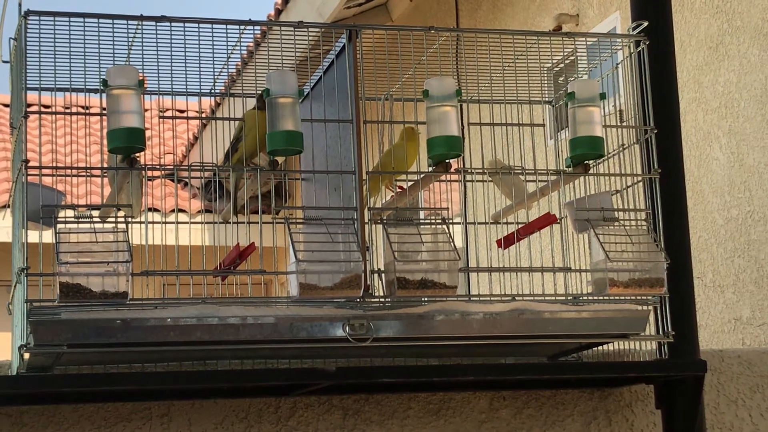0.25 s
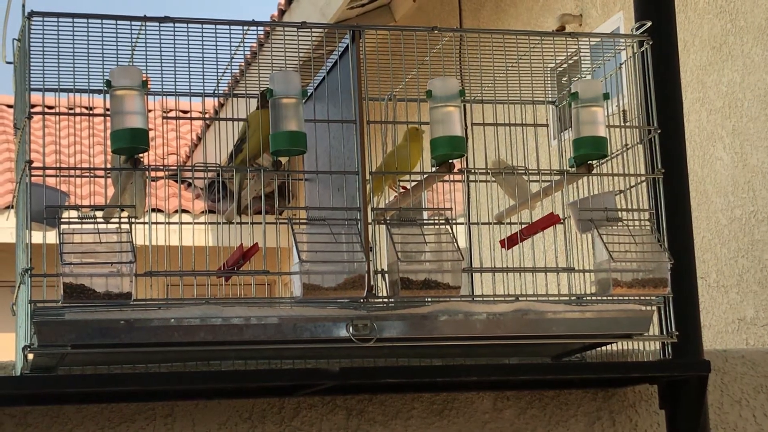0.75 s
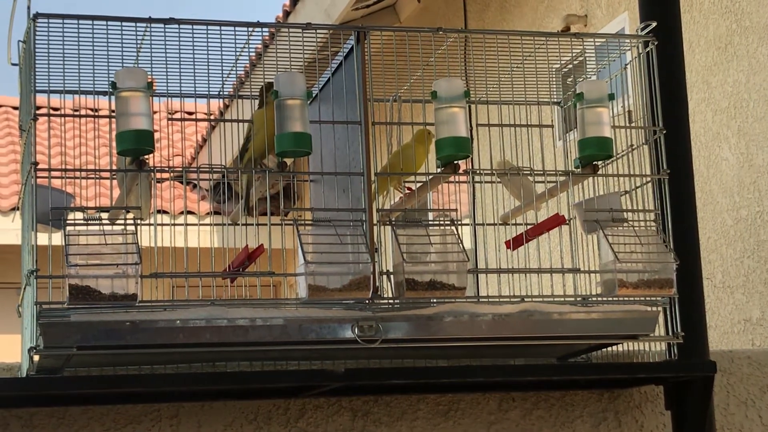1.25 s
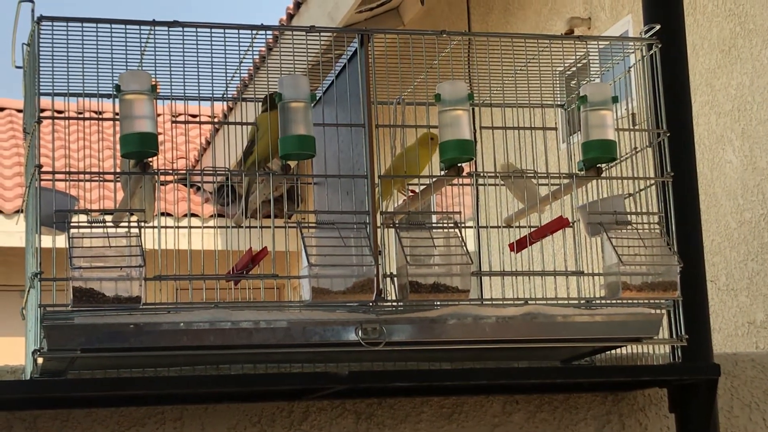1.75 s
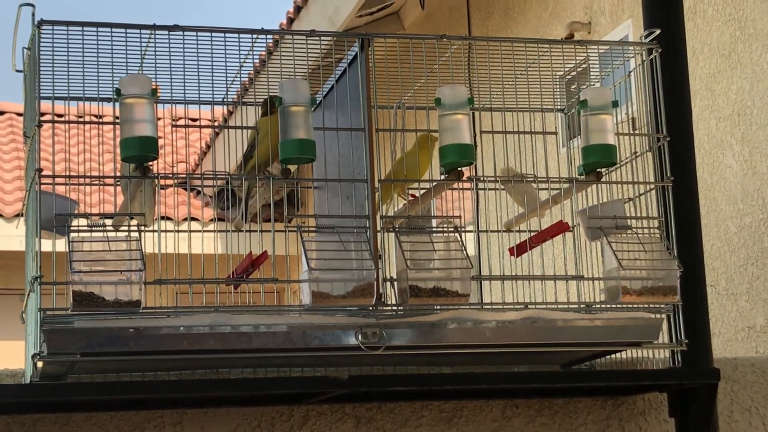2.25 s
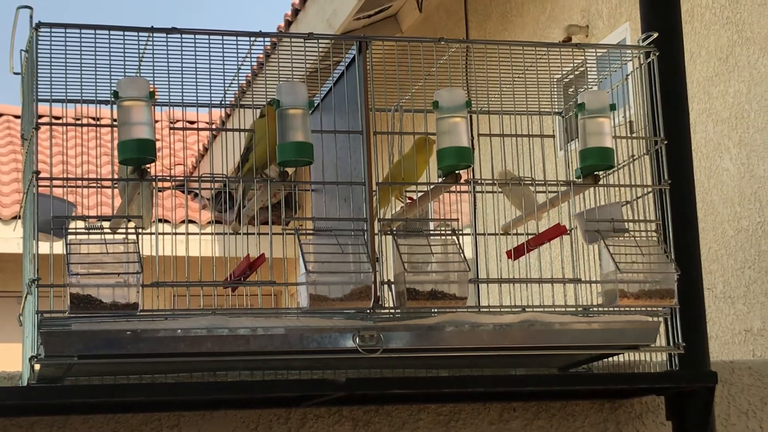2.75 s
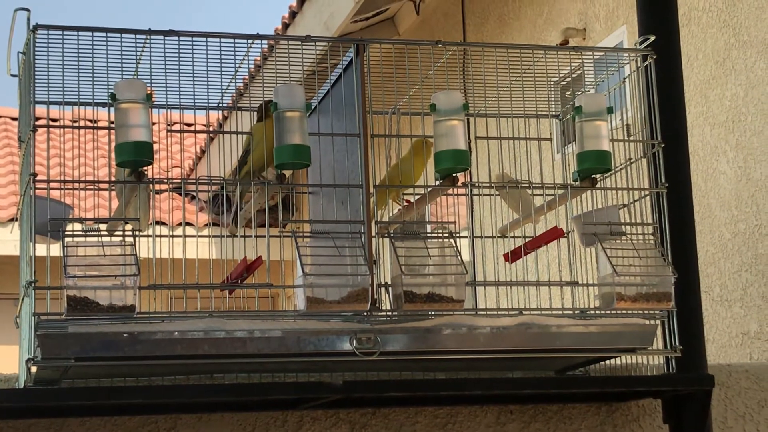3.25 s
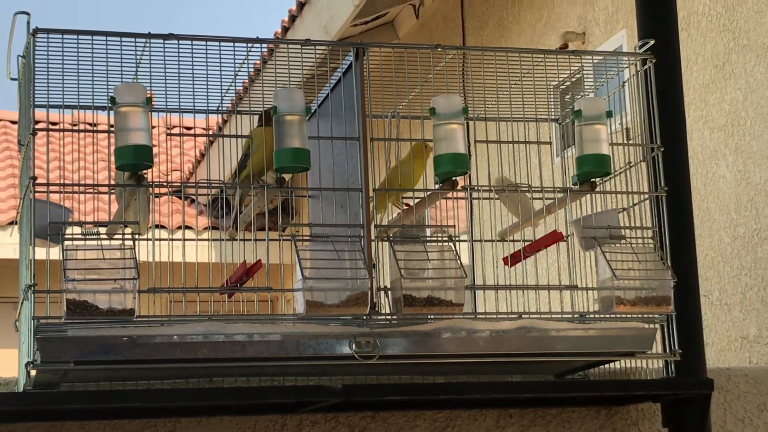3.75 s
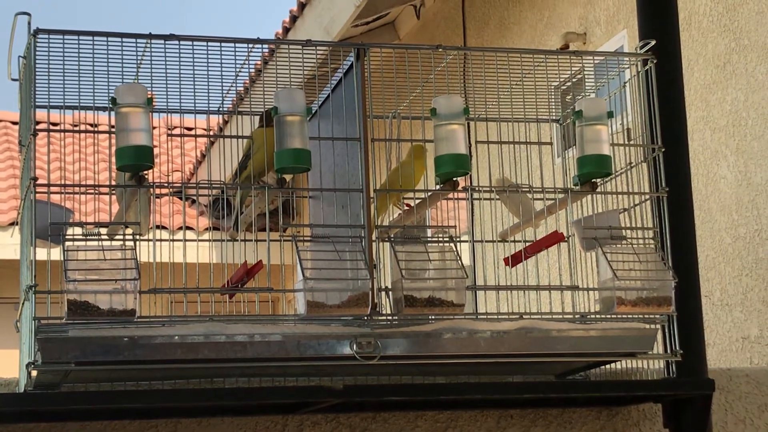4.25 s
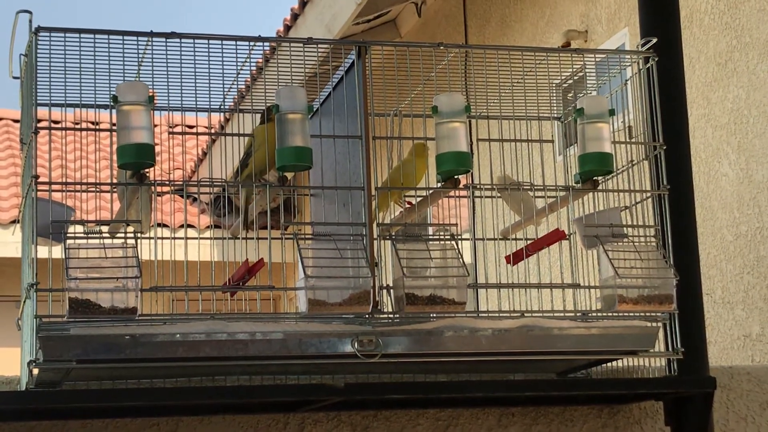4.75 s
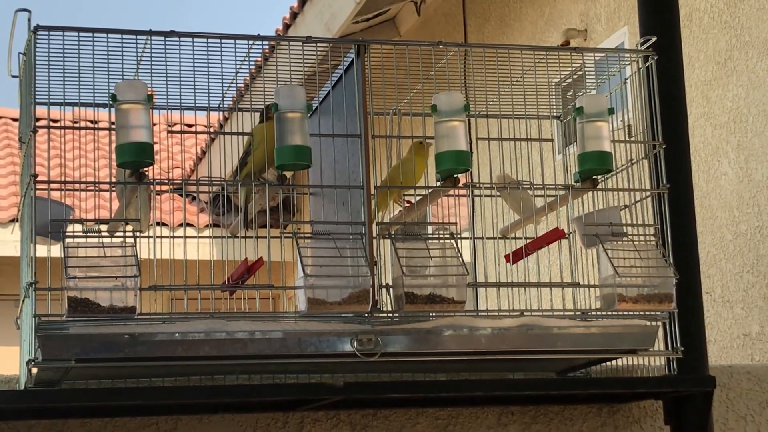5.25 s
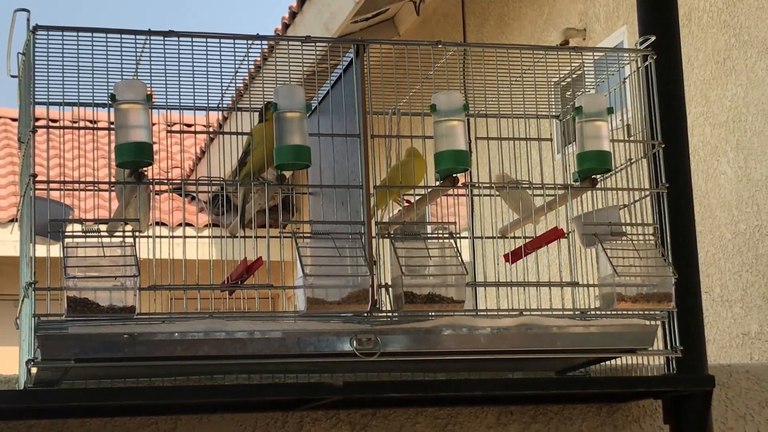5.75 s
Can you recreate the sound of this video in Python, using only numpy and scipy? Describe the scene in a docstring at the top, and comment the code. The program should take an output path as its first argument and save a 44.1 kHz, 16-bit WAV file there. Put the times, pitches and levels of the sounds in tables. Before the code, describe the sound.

Bright, crisp canary song starts at once with repeated warbling syllables, drops to purring rolls, pauses into sparse whistles, then runs through steep downward chirps and further rolls and dives before ending in rapid, nearly level pips. The cage hangs by a house wall, so notes carry slight metallic scatter and short echoes. The quiet background is soft distant traffic and low hum, with a far engine swelling late. Mono, fairly near microphone.

```python
"""Canaries sing in a wire cage under the eaves of a house: a warble, low rolls, diving syllables, a fast
closing trill. Whistles are gliding sines with a few leaked overtones; each roll beat is a raspy chip and a low
note. The treble reaches the ear mostly diffuse and smeared, the tray and walls throw the notes back, and the
yard rings briefly. Behind them lie the wash of a town in shaped noise, a machine's hum and a far engine that
comes up, then eases; both machines are sets of wavering sines."""
import sys
import numpy as np
from scipy import signal
from scipy.fft import rfft, irfft
from scipy.io import wavfile

SR = 44100
rng = np.random.default_rng(int(sys.argv[2]) if len(sys.argv) > 2 else 0)


def to_wav(s):
    """Save 16-bit WAV."""
    ch = np.atleast_2d(s).T  # columns
    pcm = np.round(np.clip(ch, -1, 1) * 32767)  # PCM
    wavfile.write(sys.argv[1], SR, pcm.astype(np.int16))


N = 263718
TIME = np.arange(N) / SR

# boost of the whistles' and pips' overtones as the beak opens: t/s, level/dB
BEAK = [(0, 6), (.45, 4), (.9, 1), (1.9, 3.5), (2.05, -3.5), (2.25, 3.5), (2.6, 3), (3.15, 2.5), (3.7, 2),
        (4.1, 1), (4.9, 3), (5.3, 3.5), (5.8, 0.5)]


def gain_of(db):
    """Decibels to amplitude."""
    return 10 ** (np.asarray(db) / 20)


def evened(x):
    """Scales to rms 1."""
    return x / np.sqrt(np.mean(x ** 2) + 1e-20)


def read(points, hz):
    """Reads a spectrum on a log-frequency axis."""
    f, value = np.transpose(points)
    return np.interp(np.log(hz + 1), np.log(f), value)


def at_time(curve, s):
    """Reads a curve at one or more times."""
    return np.interp(s, *np.transpose(curve))


def add(mix, s, sound):
    """Adds a sound to the mix at time s."""
    start = max(round(s * SR), 0)
    part = mix[start:][:len(sound)]
    part += sound[:len(part)]


def drift(rate_hz):
    """Smooth random motion of rms 1, up to about the given rate."""
    hz = np.fft.rfftfreq(N, 1 / SR)
    lowpass = np.exp(-.5 * (hz / rate_hz) ** 2)
    return evened(irfft(rfft(rng.standard_normal(N)) * lowpass, N))


def glide(length, start, middle, end):
    """Progress 0-1 through a note, and a pitch that arches through three points."""
    u = np.linspace(0, 1, max(round(length * SR), 8))
    slope = 4 * middle - 3 * start - end
    curvature = 2 * (start + end - 2 * middle)
    return u, start + slope * u + curvature * u * u


def syrinx(s, hz, tremor, jitter):
    """Phase of the vibrating membrane, whose pitch trembles a little."""
    shake = np.take(tremor, round(s * SR) + np.arange(len(hz)), mode="wrap")
    return 2 * np.pi * np.cumsum(hz * (1 + jitter * shake)) / SR


def pulsed(s, u, tremor, sharpness, unrest_db):
    """The air pressure swells and falls within one note, never quite smoothly."""
    unrest = np.take(tremor, np.arange(len(u)) - round(s * SR), mode="wrap")
    arch = np.sin(np.pi * u ** 0.95)  # peaks a little before the middle
    return abs(arch) ** sharpness * gain_of(unrest_db * unrest)


def whistle(phase, hz, second_db, third_db, fourth_db, beak_db):
    """The throat is tuned to the fundamental, so only part of the overtones gets out."""
    # leak of the overtones past the throat: f/Hz, level/dB
    leak = [(3000, -6.5), (6000, -34), (8000, -40.5), (9500, -26.5), (11000, -29.5), (13000, -21),
            (15500, -15)]
    tone = np.sin(phase)
    for k, db in enumerate((second_db, third_db, fourth_db), 2):
        level = gain_of(db + beak_db + read(leak, k * hz))
        below_nyquist = k * hz < SR / 2
        tone = tone + level * below_nyquist * np.sin(k * phase)
    return tone


def bent(s, length, hz, bend, db):
    """One note; bend holds its start and end pitch as multiples of the pitch in the middle."""
    start, end = bend
    return s, length, hz * start, hz, hz * end, db


def warble_notes():
    """Each warble syllable is a high flick, a rising whistle and a low pip."""
    # opening warble: whistle t/s, whistle f/Hz, whistle level/dB, pip f/Hz, pip level/dB
    warbles = [(.12, 4730, -31, 3940, -22.5), (0.227, 4920, -26.5, 4000, -19.5),
               (.332, 4940, -26, 3790, -25.5), (0.4421, 4740, -22, 3840, -20.5),
               (0.545, 4580, -24.5, 3410, -22), (0.6541, 4460, -23.5, 3500, -27.5),
               (0.7569, 4500, -23, 3450, -21.5), (0.8649, 4640, -22.5, 3420, -23.5)]
    for s, hz, db, pip_hz, pip_db in warbles:
        yield bent(s - 0.026, 0.0051, hz * 1.31, (0.92, 1.06), db - 4)
        yield bent(s, 0.01585, hz, (0.86, 1.072), db)
        yield bent(s + 0.041, 0.01, pip_hz, (0.96, 1.032), pip_db)


def dive_notes():
    """Each diving syllable is a flick, a steep fall and a low tail."""
    # dives: fall t/s, fall f/Hz, fall level/dB, flick's lead/s, flick f/Hz, flick level/dB, tail level/dB
    dives = [(2.536, 3050, -27.5, 0.022, 4440, -36, -40), (2.625, 3040, -28.5, 0.031, 4570, -29.5, -41.5),
             (2.709, 3130, -24.5, 0.03, 4830, -32, -38.5), (2.793, 3080, -23, 0.024, 4530, -27.5, -38.5),
             (2.882, 3183, -22.5, 0.022, 4260, -41, -39.5), (2.979, 3103, -22.5, 0.024, 5060, -35.5, -41.5),
             (4.046, 3173, -25.5, 0.021, 4990, -29, -45.5), (4.1459, 3210, -26.5, 0.025, 5950, -39, -56),
             (4.243, 3494, -23, 0.03, 5290, -33.5, -61), (4.331, 3570, -25.5, .023, 5320, -32, -63),
             (4.426, 3350, -21, 0.03, 5480, -35.5, -56), (4.508, 3495, -23.5, 0.03, 5200, -32, -45)]
    for s, hz, db, lead, flick_hz, flick_db, tail_db in dives:
        yield bent(s - lead, 0.01, flick_hz, (0.93, 1.054), flick_db)
        yield bent(s, 0.01674, hz, (1.08, 0.815), db)
        yield bent(s + 0.021, 0.022, hz * 0.63, (1.3, 0.672), tail_db)


def single_notes():
    """Lone notes around the syllables: short slurs, nearly level whistles and steep swoops."""
    # all three: t/s, length/s, middle f/Hz, level/dB
    slurs = [(0, 0.011, 5340, -32.5), (.03, .0095, 4115, -26.5), (.111, 0.016, 5700, -36),
             (.184, 0.017, 5300, -30), (.27, 0.0061, 5300, -24), (.434, 0.0091, 5230, -24.5),
             (1.8, 0.037, 4380, -30.5), (1.814, 0.018, 3800, -36.5), (1.846, 0.025, 4920, -29.5),
             (1.8646, 0.029, 3910, -30.5), (1.928, .015, 4030, -34.5), (1.952, 0.024, 5076, -24.5),
             (1.97, 0.027, 3820, -30), (2.4526, 0.012, 2430, -35.5), (2.275, .018, 3510, -37),
             (2.599, 0.0051, 3760, -27), (3.055, 0.01, 5500, -35), (3.7067, 0.026, 4660, -25.5),
             (3.7595, .02, 3370, -37.5), (3.934, 0.003, 5780, -35.5), (3.951, 0.029, 2324, -34),
             (4.568, 0.014, 5180, -29.5)]
    whistles = [(.321, 0.0065, 3766, -20), (.354, 0.046, 5260, -29.5), (.523, 0.021, 5100, -28),
                (.9776, 0.0052, 3390, -25), (1.757, 0.027, 4774, -36.5), (1.896, 0.02, 5520, -26),
                (2.011, 0.0195, 3834, -17.5), (2.029, .032, 3400, -37.5), (2.088, 0.021, 6880, -34.5),
                (2.133, 0.013, 3680, -38), (3.0816, 0.017, 4590, -20.5), (3.1218, 0.023, 3460, -30),
                (3.1898, 0.011, 4835, -29.5), (3.229, 0.011, 3670, -26), (4.759, 0.035, 6290, -45),
                (4.783, 0.0085, 4510, -29.5), (4.8673, 0.015, 4463, -25)]
    swoops = [(2.215, 0.027, 3344, -29), (2.469, 0.024, 1880, -43.5), (3.9795, 0.011, 1653, -39)]
    for table, bend in ((slurs, (1.09, 0.98)), (whistles, (0.97, 1.02)), (swoops, (1, 0.556))):
        for s, length, hz, db in table:
            yield bent(s, length, hz, bend, db)


def song():
    """Quick rising and falling whistles, alone or a few to each syllable."""
    out, tremor = np.zeros(N), drift(370)
    for s, length, start, middle, end, db in (*warble_notes(), *dive_notes(), *single_notes()):
        u, hz = glide(length, start, middle, end)
        # the wider the pitch is thrown, the rougher the membrane runs
        rough = (0.5 + 1.98 * abs(np.log(end / start))) * tremor
        phase = syrinx(s, hz, rough, jitter=0.029)
        tone = whistle(phase, hz, second_db=4.5, third_db=-2.0, fourth_db=-5.0, beak_db=at_time(BEAK, s))
        breath = pulsed(s, u, rough, sharpness=0.55, unrest_db=2.5)
        add(out, s, gain_of(db) * breath * tone)
    return out


def ring(x, t60s, build_up):
    """Dense random reflections, each band dying at its own speed; build_up in seconds."""
    hz, t, z = signal.stft(rng.standard_normal(SR), SR, nperseg=256)
    decay = gain_of(-60 * t / read(t60s, hz)[:, None])
    tail = signal.istft(z * decay, SR, nperseg=256)[1]
    tail = tail * (1 - np.exp(-(TIME[:len(tail)] / build_up) ** 2))
    return signal.fftconvolve(x, tail / np.linalg.norm(tail))[:N]


def diffuse_treble(x):
    """Lower notes pass straight through; the treble arrives mostly diffuse and smeared."""
    # share of the sound's power that arrives diffuse: f/Hz, share/0-1
    diffuse_share = [(3000, 0.01), (4200, 0), (6000, 0), (9000, 0.88)]
    # decay of the diffuse sound: f/Hz, t60/s
    diffuse_decay = [(3000, 0.086), (12000, 0.011)]
    spectrum = rfft(x, 2 * N)
    share = np.clip(read(diffuse_share, np.fft.rfftfreq(2 * N, 1 / SR)), 0, 1)
    passed = irfft(spectrum * np.sqrt(1 - share))[:N]
    diffuse = irfft(spectrum * np.sqrt(share))[:N]
    return passed + ring(diffuse, diffuse_decay, build_up=0.0009)


def echoes(x):
    """Single reflections from the nearest surfaces."""
    # early echoes from tray, wall and eaves: delay/s, relative strength
    reflections = [(.0028, 0.14), (.0047, 0.097), (.0083, 0.1), (.017, 0.26)]
    out = np.zeros(N)
    for delay, strength in reflections:
        add(out, delay, strength * x)
    return out


def surroundings(whistles, low):
    """Tray, walls and yard throw back what the birds send towards them."""
    # sound sent to the walls, as the singer turns its head: t/s, level/dB
    turned = [(0, 3), (.4, 1.5), (.9, -0.5), (2.0, -5.5), (2.6, 1), (3.1, -1), (4.3, 1), (5.1, 3.5),
              (5.45, 0.5), (5.7, -3)]
    # ring of the yard: f/Hz, t60/s
    yard_decay = [(1500, 0.31), (4000, 0.28), (7000, 0.28), (15000, 0.2)]
    # low notes spread more evenly from the beak, so more of them reaches the walls
    thrown = gain_of(at_time(turned, TIME)) * (whistles + gain_of(3.0) * low)
    return gain_of(2.5) * echoes(thrown) + gain_of(-4.5) * ring(thrown, yard_decay, build_up=0.002)


def town(level_db=-45.5):
    """Far traffic merged into a soft, steady wash of shaped noise."""
    # spectral shape of the wash: f/Hz, relative level per Hz/dB
    wash_shape = [(20, -7), (38, -11), (60, 5), (90, 1), (130, 2), (220, 0.5), (300, -3), (450, -9.5),
                  (900, -7.5), (1800, -10.5), (3500, -16.5), (7000, -26.5), (12000, -36.5), (16000, -34.5)]
    shape = gain_of(read(wash_shape, np.fft.rfftfreq(N, 1 / SR)))
    wash = irfft(rfft(rng.standard_normal(N)) * shape, N)
    return gain_of(level_db) * evened(wash)


def drone(hz, waver_hz, flutter_db):
    """A machine tone of rms about 1, wavering in pitch and level."""
    cycles = np.cumsum(hz + waver_hz * drift(4.74)) / SR + rng.random()
    return np.sqrt(2) * np.sin(2 * np.pi * cycles) * gain_of(flutter_db * drift(2.5))


def machine_hum():
    """A constant set of low tones, each wavering on its own."""
    # tones of the machine: f/Hz, approximate rms level/dB
    hum_tones = [(57, -57.5), (68, -51.5), (118, -59.5), (235, -60), (646, -62.5), (788, -62.5),
                 (999, -63.5), (1175, -70.5)]
    return sum(gain_of(db) * drone(hz, waver_hz=1.305, flutter_db=2.6) for hz, db in hum_tones)


def roll_beats(rate_hz=34.4):
    """Rolls beat at nearly the same rate, with scattered time, level and low-note pitch."""
    # low rolls, one curve each: t/s, chip level/dB, chip f/Hz, drop of every second chip/0-1,
    # low note against the chip/dB, chip overtones above the second/dB
    roll_curves = [
        [(.612, -33.5, 1834, 0.03, 1, -25), (.645, -30, 1636, 0.04, -4, -27), (.74, -37, 1344, 0.12, 4, -22)],
        [(.998, -30.5, 1486, 0, -1, -23), (1.085, -34.5, 1380, 0.06, -1, -23),
         (1.125, -36.5, 1280, 0.01, 0.5, -26), (1.2, -42, 1216, 0.01, 6, -30), (1.235, -37.5, 1237, 0, 5, -34),
         (1.355, -36.5, 1240, 0.01, -3, -32), (1.39, -61, 1270, 0.07, -3, -32)],
        [(3.301, -32, 1723, 0.02, -0.5, -20), (3.365, -38.5, 1510, .16, 1, -20),
         (3.49, -35, 1497, .15, 3.5, -19), (3.665, -31.5, 1487, 0.24, -7, -20)],
        [(5.332, -39, 1112, 0, -12, -14), (5.36, -30, 1663, 0, -13, -18.5),
         (5.392, -29.5, 1556, 0.05, -6.5, -21), (5.42, -40.5, 1294, 0, 3, -17.5),
         (5.49, -37.5, 1210, 0.03, 1, -18)],
    ]
    for curve in roll_curves:
        times, *controls = np.transpose(curve)
        for k, (late, louder, higher) in enumerate(rng.standard_normal((16, 3))):
            s = times[0] + k / rate_hz
            if s < times[-1]:
                db, hz, drop, low_db, upper_db = (np.interp(s, times, control) for control in controls)
                db = db - 0.5 * louder
                chip_hz = hz * (1 - drop * (k % 2))
                low_hz = hz * (1 + 0.0724 * higher)
                yield s + 0.0015 * late, db, chip_hz, db + low_db, low_hz, upper_db


def rolls(chip_s=0.01084, low_s=0.0147, low_lag_s=0.007):
    """Each raspy beat is a short chip on the overtones, then a low note on the fundamental."""
    # the throat, opened wide for the rolls: f/Hz, level/dB
    wide_throat = [(1100, -25), (1450, -3), (1900, -2), (2500, 2.5), (3000, 2), (3600, 0), (4300, -1),
                   (7000, -10.5), (12500, -9)]
    out, tremor = np.zeros(N), drift(500)
    for s, db, pitch, low_db, low_hz, upper_db in roll_beats():
        end = pitch * (1 + rng.uniform(-0.044, 0.093))
        u, hz = glide(chip_s, pitch * 0.86, pitch, end)
        phase = syrinx(s, hz, tremor, jitter=0.037)
        chip = 0
        for k in range(2, 11):  # the fundamental is left out
            level_db = read(wide_throat, k * hz) + upper_db * (k > 2)
            chip = chip + gain_of(level_db) * np.sin(k * phase)
        breath = pulsed(s, u, tremor, sharpness=1.0, unrest_db=3.5)
        add(out, s, gain_of(db) * breath * chip)

        u, hz = glide(low_s, low_hz * 1.273, low_hz, low_hz * 0.91)
        low = gain_of(read(wide_throat, hz)) * np.sin(syrinx(s, hz, tremor, jitter=0.038))
        breath = pulsed(s, u, tremor, sharpness=0.58, unrest_db=1.5)
        add(out, s + low_lag_s, gain_of(low_db) * breath * low)
    return out


def far_engine(base_hz=78.3, third_db=-8.5):
    """The second and third orders of a far engine, following one level curve."""
    # the engine comes up, then eases: t/s, level of the second order/dB
    approach = [(0, -98), (3.3, -57), (4.1, -52), (5.1, -46), (5.5, -46.5), (5.98, -49.5)]
    second = drone(2 * base_hz, waver_hz=1.47, flutter_db=1.0)
    third = gain_of(third_db) * drone(3 * base_hz, waver_hz=1.47, flutter_db=1.0)
    return gain_of(at_time(approach, TIME)) * (second + third)


def trill():
    """Nearly level pips, each on its own puff of air."""
    # pips of the closing trill: t/s, f/Hz
    pips = [(4.8155, 4183), (4.9223, 4160), (4.932, 4426), (4.987, 4365), (5.0377, 4186), (5.0904, 4010),
            (5.1229, 4150), (5.145, 3820), (5.173, 4410), (5.216, 4110), (5.2607, 3920), (5.3036, 4180),
            (5.346, 4220), (5.3919, 4030), (5.4387, 3994), (5.4911, 4056), (5.547, 4220), (5.6052, 4127),
            (5.658, 4174), (5.7196, 4130), (5.7771, 4043), (5.8355, 4220), (5.893, 4020), (5.954, 3980)]
    # effort through the trill: t/s, level/dB
    swell = [(4.82, -26.5), (5.16, -25), (5.22, -16), (5.32, -27.5), (5.44, -20), (5.56, -19), (5.66, -15),
             (5.85, -19), (5.96, -14.5)]
    # length of the pips: t/s, length/s
    pip_length = [(4.8, .011), (5.335, 0.0064), (5.604, 0.009), (5.95, .013)]
    out, tremor = np.zeros(N), drift(217)
    for s, pitch in pips:
        u, hz = glide(at_time(pip_length, s), pitch * 0.99, pitch, pitch * 1.005)
        phase = syrinx(s, hz, tremor, jitter=0.0095)
        tone = whistle(phase, hz, second_db=5.5, third_db=-1.0, fourth_db=-10.0, beak_db=at_time(BEAK, s))
        puff = pulsed(s, u, tremor, sharpness=1.24, unrest_db=2.2)
        add(out, s, gain_of(at_time(swell, s)) * puff * tone)
    return out


def scene():
    """The birds, their treble partly smeared and thrown back off the walls, over the background."""
    whistles = diffuse_treble(gain_of(0.07) * song() + gain_of(0.9) * trill())
    low = diffuse_treble(gain_of(-2.5) * rolls())
    birds = whistles + low + surroundings(whistles, low)
    background = town() + machine_hum() + far_engine()
    return (birds + background)[None]


def record(dry):
    """Band limit: a steep linear-phase low-pass."""
    lowpass = signal.firwin(511, 15950, window=("kaiser", 9), fs=SR)  # cutoff in Hz
    return signal.oaconvolve(dry, lowpass[None], "same")


dry = scene()
out = record(dry)
to_wav(out)
```